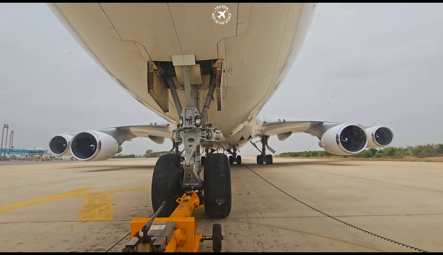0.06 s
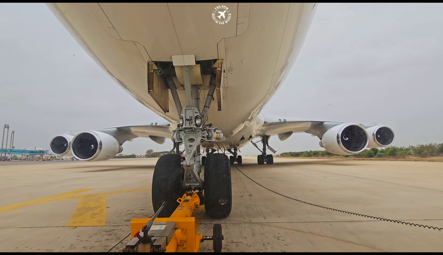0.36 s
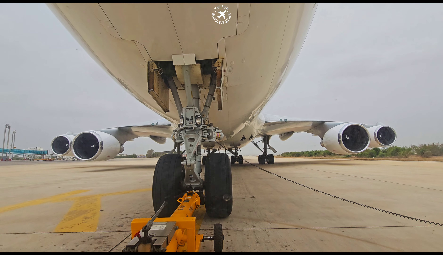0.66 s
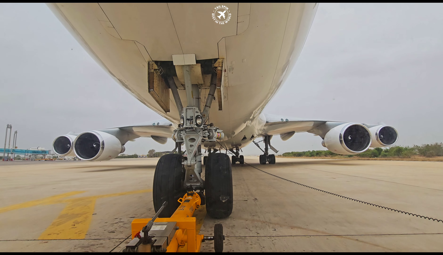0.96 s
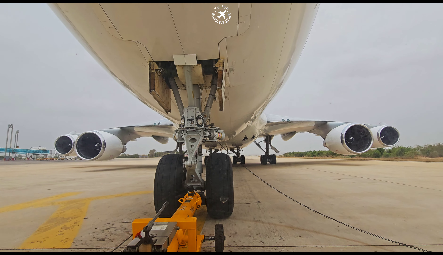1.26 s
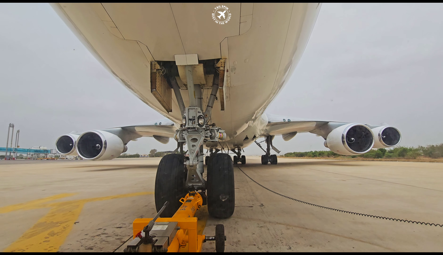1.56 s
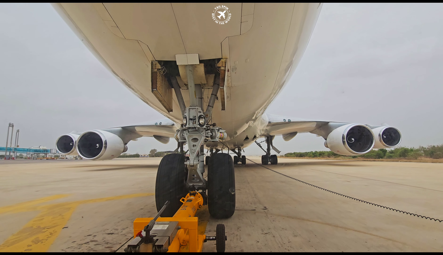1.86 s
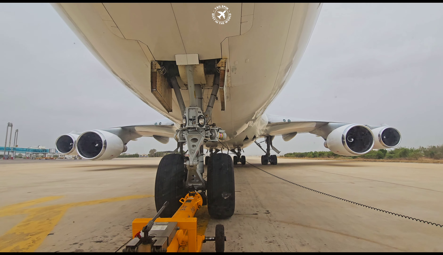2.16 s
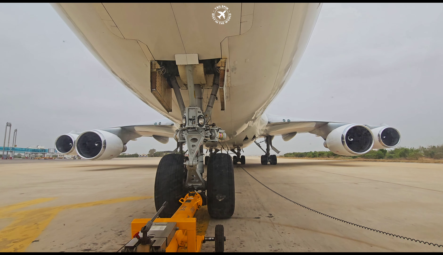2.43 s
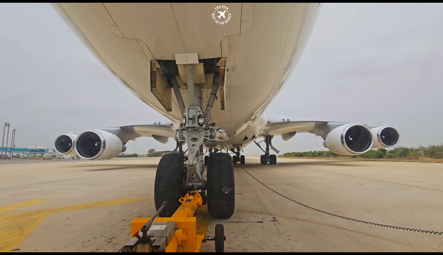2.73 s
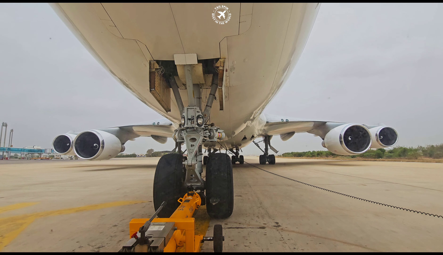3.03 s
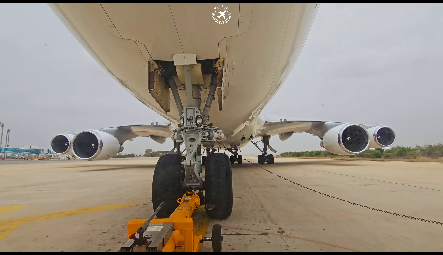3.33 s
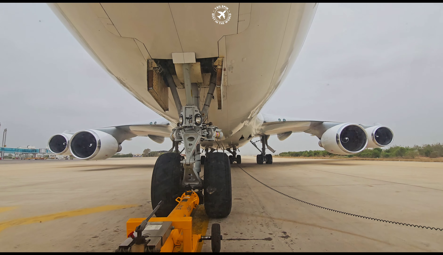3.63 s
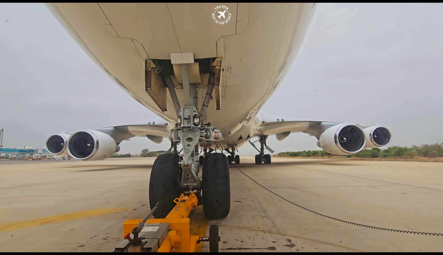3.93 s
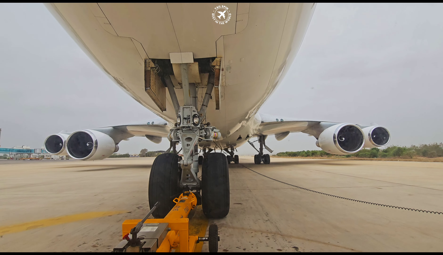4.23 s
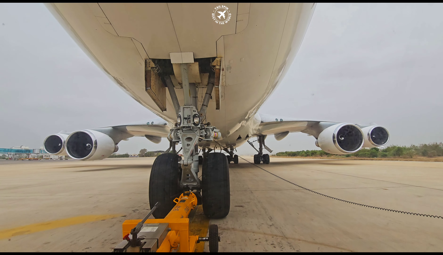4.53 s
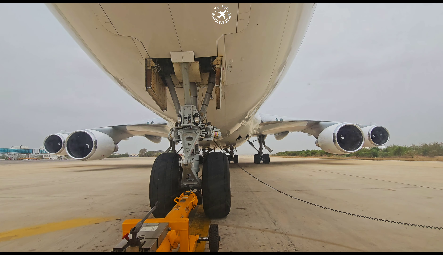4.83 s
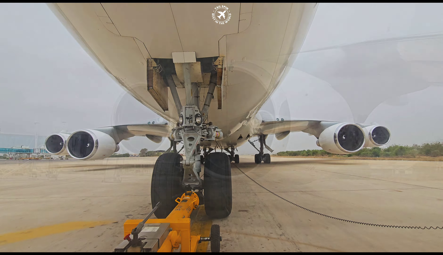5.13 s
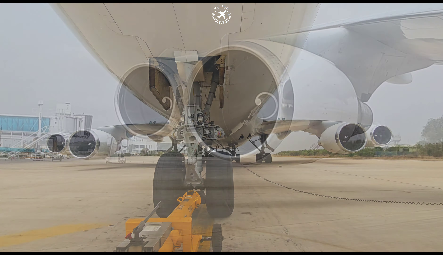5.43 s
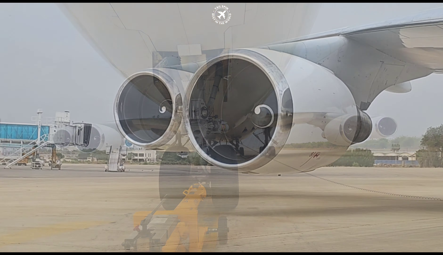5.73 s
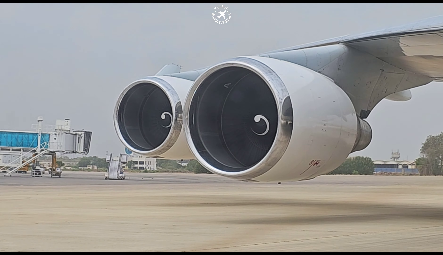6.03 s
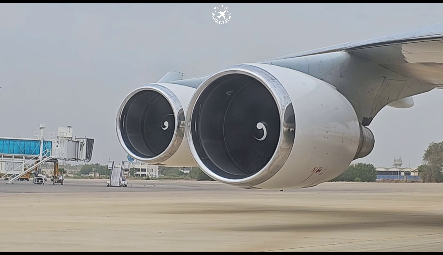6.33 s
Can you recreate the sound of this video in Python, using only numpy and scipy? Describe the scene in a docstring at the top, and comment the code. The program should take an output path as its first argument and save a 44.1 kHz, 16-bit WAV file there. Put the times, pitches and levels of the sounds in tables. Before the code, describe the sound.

An idling jet whines and hisses over a droning, throbbing diesel tug with one metal clank, then roars louder with a piercing whistle.

```python
"""On an airport apron, at the nose wheel of an idling four-engined jet: compressor blades whine over
intake hiss. The diesel tug on the tow bar drones and slows, the bar's modes clank at 3.1 s, and the
labouring tug booms, throbbing as two close tones beat. From 5.2 s the sound dissolves to a spot before
the intakes: a louder roar of turbulent flow, fan tones and a piercing whistle."""
import sys
import numpy as np
from scipy import signal
from scipy.fft import rfft, irfft
from scipy.io import wavfile
from scipy.ndimage import uniform_filter1d, minimum_filter1d

SR = 44100
rng = np.random.default_rng(int(sys.argv[2]) if len(sys.argv) > 2 else 0)


def unload_audio(sound):
    """Save the sound as a 16-bit wav file, at the path given as the first command line argument."""
    columns = np.transpose(np.atleast_2d(sound))
    # keep every value between -1 and 1, then stretch to whole-number steps
    steps = np.round(np.clip(columns, -1, 1) * 32767)
    wavfile.write(sys.argv[1], SR, steps.astype(np.int16))


N = 285768
T = np.arange(N) / SR
FREQ = np.maximum(np.arange(N // 2 + 1) * SR / N, 1)
SIDES = np.array([[1], [-1]])  # left, right; a pan is left minus right
DISSOLVE_S = (5.19, 5.78)


def undb(db):
    """Decibels as an amplitude ratio."""
    return 10 ** (np.asarray(db) / 20)


def unit(x):
    """Normalisation: the mean of the channels gets rms 1."""
    return x / np.std(np.atleast_2d(x).mean(axis=0))


def curves(table):
    """Linear interpolation of a time table's columns, sample by sample."""
    times, *columns = np.transpose(table)
    return [np.interp(T, times, c) for c in columns]


def over_hz(table):
    """Interpolation of a spectrum table's columns over log frequency, bin by bin."""
    hz, *columns = np.transpose(table)
    return [np.interp(np.log(FREQ), np.log(hz), c) for c in columns]


def walk(rate_hz, channels=1):
    """Low-passed Gaussian noise: smooth random motion of spread 1."""
    x = irfft(rfft(rng.standard_normal((channels, N))) / (1 + (FREQ / rate_hz) ** 2), N)
    return x / x.std(axis=1, keepdims=True)


def turn(hz):
    """Phase as the integral of frequency, from a random start."""
    return 2 * np.pi * (np.cumsum(hz + 0 * T) / SR + rng.random())


def air(gain):
    """Partly coherent turbulent noise: alike at both ears in the bass, diffuse in the treble."""
    # stereo image of the noise: frequency_hz, side_minus_mid_db, pan_db
    image = [(50, -21.5, 2.6), (113, -34, -1.5), (202, -6, 3), (403, -10.5, 0), (700, -4.5, 1.5),
             (1350, 3, -2.5), (2280, -1.5, -3), (4240, 1.5, -3), (8500, -0.5, 1), (15000, 0.5, -2)]
    side_db, pan_db = over_hz(image)
    mid, side = rfft(rng.standard_normal((2, N)))
    spectrum = gain * (mid + SIDES * undb(side_db) * side) * undb(SIDES * pan_db / 2)
    return unit(irfft(spectrum, N))


def wash(colour, flutter_db):
    """Band-limited flow noise under slight random amplitude modulation."""
    inside = (FREQ > colour[0][0]) & (FREQ < colour[-1][0])
    return air(undb(over_hz(colour)[0]) * inside) * undb(flutter_db * walk(8.7))


def resonance(hz, width_hz):
    """Gain of a steep-sided resonance with unit power."""
    gain = 1 / (1 + ((FREQ - hz) / width_hz) ** 2)
    return gain / np.linalg.norm(gain)


def unsteady_tones(table, width_hz):
    """Spectral broadening: turbulence smears machine tones into narrow, fading lines."""
    gain = np.sqrt(sum((undb(db) * resonance(hz, width_hz)) ** 2 for hz, db in table))
    return air(gain) * np.linalg.norm(gain)


def eased(drop_db, span_s=(4.08, 4.35)):
    """Exponential decay: the gain sinks by drop_db over a span as the tug eases off."""
    return undb(-drop_db * np.interp(T, span_s, (0, 1)))


def tug_gears():
    """Forced vibration: shaft harmonics sink through the body's resonances as the tug slows."""
    # drive shaft: time_s, speed_hz, level_db
    drive = [(0, 54.09, 1), (.7, 54, -3), (1.2, 53.6, 1.5), (1.8, 54.3, -3), (2.3, 54.04, 2),
             (2.55, 53.2, 2), (2.7, 48.35, -2.5), (2.85, 45.2, -7.5), (3.35, 44.47, -7.5), (3.65, 41, 0),
             (4.0, 39.18, -3.5), (4.2, 38, -1), (4.4, 37.5, -41)]
    # how strongly the tug's body radiates: frequency_hz, gain_db
    body = [(112, -44), (122, -21), (136, -21), (148, -34), (162, -21.5), (176, -28), (196, -19),
            (216, -34.5), (240, -16.5), (270, -18), (340, -64), (445, -29), (500, -41), (540, -34.5),
            (600, -57), (675, -30), (790, -53.5)]
    shaft_hz, drive_db = curves(drive)
    body_hz, body_db = np.transpose(body)
    phase = turn(shaft_hz * (1 + 0.0018 * walk(7.5)[0]))
    gears = 0
    for k in (3, 5, 10, 15):
        level_db = drive_db + np.interp(k * shaft_hz, body_hz, body_db) + 1.85 * walk(3)
        gears = gears + np.sin(k * phase) * undb(level_db)
    return gears * undb(SIDES)  # 2 dB stronger on the left


def tug_diesel():
    """Periodic firing gives a line spectrum, which weakens steadily as the tug slows."""
    # firing orders: pitch_hz, level_db
    orders = [(27.5, -38), (41, -34.5), (52.5, -29.5), (82, -28.5), (104, -40), (122.5, -51), (163, -29.5),
              (283, -38.5), (345, -42), (403, -52), (484, -48), (499, -38)]
    return unsteady_tones(orders, width_hz=1.5) * undb(1.9) * eased(drop_db=4, span_s=(2, 3.9))


def tug_flow():
    """Flow noise has a continuous spectrum: a rumble and a roar that sink as the tug eases off."""
    # rumble spectrum: frequency_hz, density_db
    rumble_colour = [(16, -27), (27, 2), (43, -4), (102, -6.5), (157, -6), (172, -7.5), (189, -15),
                     (200, -20), (260, -18.5), (440, -120)]
    # roar spectrum: frequency_hz, density_db
    roar_colour = [(100, -47), (170, -19), (205, -7), (227, -11.5), (284, 0), (350, -8.5), (373, -9.5),
                   (490, -12), (564, -15), (611, -13), (716, -21), (909, -22), (1400, -30), (1820, -75),
                   (3080, -120)]
    rumble = wash(rumble_colour, flutter_db=0.3) * undb(-19.5) * eased(drop_db=5.5)
    roar = wash(roar_colour, flutter_db=1.1) * undb(-25.5) * eased(drop_db=3)
    return rumble + roar


def blade_tone(hz, wander, flutter_db, pan_db, lag_rad=0):
    """A blade-passing tone, modulated in phase and level by moving air on its way to each ear."""
    bend = wander * (walk(13.5) + 0.58 * walk(2.7, channels=2))
    tone = np.sin(turn(hz) + bend + SIDES * lag_rad / 2)
    return unit(tone * undb(flutter_db * walk(38, channels=2) + SIDES * pan_db / 2))


def fading(rate_hz=13.5, common_db=1.5, sway_db=2.5):
    """Scintillation: moving air makes a tone's gain vary at both ears together and sway between them."""
    return undb(common_db * walk(rate_hz) + sway_db * walk(rate_hz, channels=2))


def skirt(hz, width_hz, pan_db):
    """Scattering: intake turbulence spreads part of a blade tone into sidebands."""
    gain = (1 + (2 * (FREQ - hz) / width_hz) ** 2) ** -.7
    return air(gain) * undb(SIDES * pan_db / 2)


def compressor_whine(blade_hz=3039):
    """Blade passing heard from the nose: a harmonic series of shimmering cores in scattered skirts."""
    # drift of the fundamental: time_s, level_db, pan_db
    blade_drift = [(0, -40.5, 3), (0.3, -45.5, -14), (0.65, -47, -11), (0.9, -45.5, -13), (1.4, -51.5, 11),
                   (1.7, -44, -1), (1.98, -54, -2), (2.15, -36, 4), (2.5, -44.5, -0.5), (2.78, -42.5, -6),
                   (3.1, -46, -1), (3.45, -40.9, 7.5), (3.85, -39.5, -7.5), (4.25, -40.5, -10.5),
                   (4.6, -50, 0), (5.2, -42.5, -4)]
    # drift of its octave: time_s, level_db, pan_db
    octave_drift = [(0, -37.5, -13), (0.55, -37.5, -8), (1.0, -41, -8), (1.45, -41, -10.6),
                    (1.68, -34, -14), (2.1, -38, -5.1), (2.55, -43.5, -12), (2.82, -32, -12),
                    (3.1, -35.5, 13), (3.55, -40, 3), (3.72, -30, -4), (4.28, -31, 5), (4.5, -39, 2),
                    (4.75, -37.5, 2), (5.05, -31, 1), (5.2, -33.5, -1)]
    # overtones, levels relative to the octave's: multiple, core_db, skirt_db, width_hz, pan_db
    overtones = [(2, 0, -5.5, 100, -3), (3, -19.5, -14, 170, 2), (4, -24, -20, 280, -1),
                 (5, -34, -21.5, 350, 0)]
    blade_db, blade_pan_db = curves(blade_drift)
    octave_db, octave_pan_db = curves(octave_drift)
    tone = blade_tone(blade_hz, wander=0.37, flutter_db=1.2, pan_db=blade_pan_db, lag_rad=1.96)
    whine = tone * undb(blade_db + 2) * fading()
    whine += skirt(blade_hz, width_hz=77, pan_db=0) * undb(-48.5)
    steady_db = (octave_db + octave_db.mean()) / 2  # scattered sound fades less than the direct tone
    sway_db = octave_pan_db - octave_pan_db.mean()
    for k, core_db, skirt_db, width_hz, pan_db in overtones:
        core = blade_tone(k * blade_hz, wander=.6, flutter_db=2, pan_db=pan_db + sway_db) * fading()
        whine += core * undb(octave_db + core_db)
        whine += skirt(k * blade_hz, width_hz, pan_db) * undb(steady_db + skirt_db + 5)
    return whine


def intake_hiss():
    """Broadband flow noise of the intakes heard from the nose, with a faint narrowband hum."""
    # hiss spectrum: frequency_hz, density_db
    colour = [(900, -5), (1500, -1.5), (2000, -0.5), (2600, -4.5), (3900, -5.5), (4400, -5), (5100, -8),
              (7000, -8), (8800, -11), (10200, -21.5), (11700, -7.5), (13500, -17.5), (15500, -29)]
    hum = unsteady_tones([(893, -47)], width_hz=14)
    return hum + wash(colour, flutter_db=0.76) * undb(-37.5) * eased(drop_db=1.2)


def tow_bar(contact_s=.0013):
    """Impact excitation: the bar takes up its slack in a rattle; each rough contact rings damped modes."""
    # modes of the bar: pitch_hz, level_db, t60_s
    modes = [(470, -22, .1), (497, -18, .2), (947, -27, .16), (1130, -29, .07), (1320, -32, .06),
             (1770, -26, .08), (1840, -28, .07), (2005, -26, .14), (2140, -32, .07), (2330, -35, .06)]
    # contacts: start_s, strength_db
    knocks = [(3.092, -4), (3.099, 0), (3.107, 0), (3.118, 1), (3.139, -9)]
    t = T[:SR // 2]
    ring = sum(undb(db - 60 * t / t60) * np.sin(2 * np.pi * hz * t) for hz, db, t60 in modes)
    push = sum(undb(db) * (T > s) * np.exp(-np.abs(T - s) / contact_s) for s, db in knocks)
    grit = rng.standard_normal(N) + 0.56 * rng.standard_normal((2, N))
    blunt = signal.butter(4, 2400, fs=SR, output="sos")  # heavy parts meet softly
    force = signal.sosfilt(blunt, grit * push) / np.sqrt(contact_s * SR)
    return signal.fftconvolve(force, ring[None], axes=1)[:, :N] * undb(0.5)


def tug_boom(beat_hz=9, beat_from_s=4.4, crest_s=4.98):
    """Beating: a weaker tone grows just above the loaded tug's boom and makes it throb."""
    # boom of the labouring tug: time_s, pitch_hz, level_db
    boom = [(3.0, 46.33, -59), (3.25, 45.74, -19), (4.04, 45, -19.5), (4.16, 43.7, -9.5),
            (4.6, 42.95, -14.5), (5.08, 41.4, -12), (5.3, 39.1, -22)]
    hz, db = curves(boom)
    phase = turn(hz)
    beat = 2 * np.pi * beat_hz * (T - crest_s)
    depth = np.clip(0.45 * (T - beat_from_s), 0, 0.45)
    return (np.sin(phase) + depth * np.sin(phase + beat)) * undb(db)


def whistle():
    """A piercing, nearly pure blade tone before the intakes, swelling as it wanders past the listener."""
    # the whistle's course: time_s, level_db
    course = [(5.22, -38.5), (5.42, -52), (5.6, -42), (5.67, -32.5), (5.83, -26), (6.03, -31.5),
              (6.2, -24.5), (6.37, -14.5), (6.48, -24.5)]
    tone = blade_tone(4005.5, wander=0.23, flutter_db=0.5, pan_db=-1, lag_rad=-0.58)
    return tone * undb(curves(course)[0])


def swell(level_db, db_per_s):
    """Exponential growth: a gain that passes level_db as the dissolve ends."""
    return undb(level_db + db_per_s * (T - DISSOLVE_S[1]))


def exhaust():
    """Jet noise: the turbulent exhaust gives a swelling rumble."""
    # exhaust spectrum: frequency_hz, density_db
    colour = [(29, -42), (50, -4), (107, -5.5), (150, -1.5), (194, -14), (235, -9.5), (269, -1.5),
              (314, -11.5), (355, -9.5), (391, -22.5), (425, -11.5), (457, -24.5), (555, -9.5), (626, -18),
              (900, -34.5), (1170, -54), (1980, -120)]
    return wash(colour, flutter_db=0.5) * swell(-16, db_per_s=4.5)


def buffeting(hz=41.25):
    """A low pressure oscillation, randomly modulated, with a rough octave of narrowband noise."""
    swing = np.sin(turn(hz) + .7 * walk(6)) * undb(3 * walk(8))
    octave = air(resonance(2 * hz, width_hz=18)) * undb(-6)
    return (swing + octave) * swell(-14, db_per_s=4.5)


def fan_rush():
    """Broadband flow noise of the fans, slowly swelling."""
    # rush spectrum: frequency_hz, density_db
    colour = [(700, -7.5), (1150, -8), (1550, -10.5), (2000, -2), (2350, -5), (2650, -12), (2950, -10),
              (3400, -11.5), (4050, -7.5), (4650, -11), (4850, -16.5), (6300, -18.5), (9000, -30),
              (15000, -34)]
    return wash(colour, flutter_db=1.25) * swell(-24, db_per_s=3)


def rotor_tones():
    """Rotating blades radiate line spectra, here broadened by turbulence."""
    # fan tones: pitch_hz, level_db
    fan = [(1034, -37.5), (1179, -34.5), (1324, -39), (1615, -37), (1733, -53), (1863, -55), (1949, -31),
           (2062, -54), (2126, -49), (2202, -56), (2272, -34.5), (2815, -32), (2891, -39)]
    # compressor tones just above the whistle: pitch_hz, level_db
    stages = [(4221, -49), (4581, -41.5)]
    return unsteady_tones(fan, width_hz=7.9) * undb(-2.5) + unsteady_tones(stages, width_hz=2.4) * undb(1)


def close_whine(fade, blade_hz=3049):
    """Blade passing before the intakes: the fundamental fades in ahead of its scattered overtones."""
    # overtone skirts: multiple, width_hz, level_db
    bands = [(2, 60, -39), (3, 250, -48)]
    tone = blade_tone(blade_hz, wander=0.28, flutter_db=3.5, pan_db=-7.5, lag_rad=-2.28) * undb(-29.5)
    skirts = sum(skirt(k * blade_hz, width_hz, pan_db=6) * undb(db) for k, width_hz, db in bands)
    return fade ** 0.65 * tone + fade * skirts


def scene():
    """Superposition at two spots: the nose wheel crossfades into the spot before the intakes."""
    fade = np.interp(T, DISSOLVE_S, (0, 1))
    tug = tug_gears() + tug_diesel() + tug_flow() + tug_boom()
    nose = tug + compressor_whine() + intake_hiss() + tow_bar()
    close = fade ** 0.58 * exhaust()  # a smaller exponent fades in sooner
    close += fade * (buffeting() + rotor_tones())
    close += fade ** 0.43 * fan_rush()
    close += np.minimum(8 * fade, 1) * whistle()  # the whistle cuts through first
    close += close_whine(fade)
    return (1 - fade) * nose + close


def record(dry, top_hz=15450):
    """Look-ahead limiting turns down peaks beyond full scale; a steep low-pass cuts the top."""
    headroom = minimum_filter1d(1 / np.maximum(np.abs(dry).max(axis=0), 1), size=441)
    limited = dry * uniform_filter1d(headroom, size=441)
    soft_start = np.minimum(T / .002, 1)
    low_pass = signal.ellip(12, .1, 90, top_hz, fs=SR, output="sos")
    return signal.sosfilt(low_pass, limited * soft_start)


dry = scene()
out = record(dry)
unload_audio(out)
```